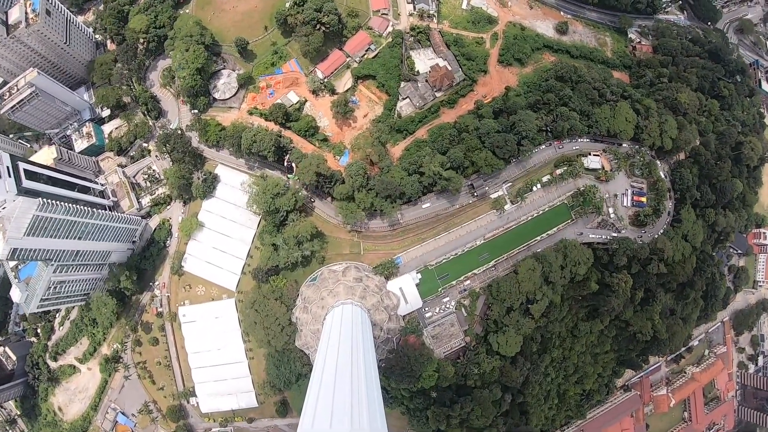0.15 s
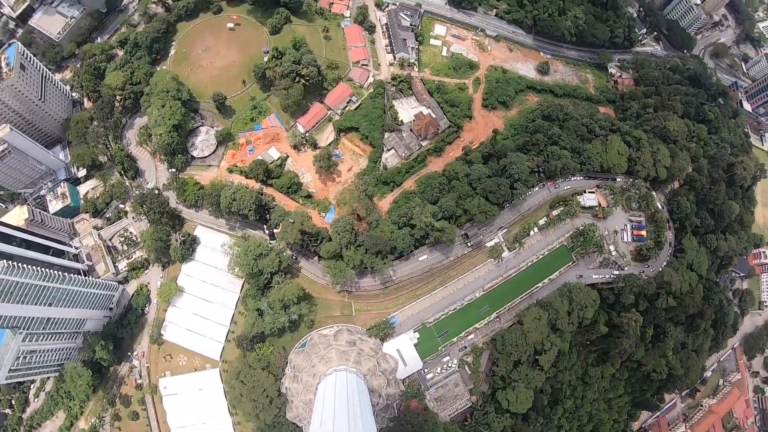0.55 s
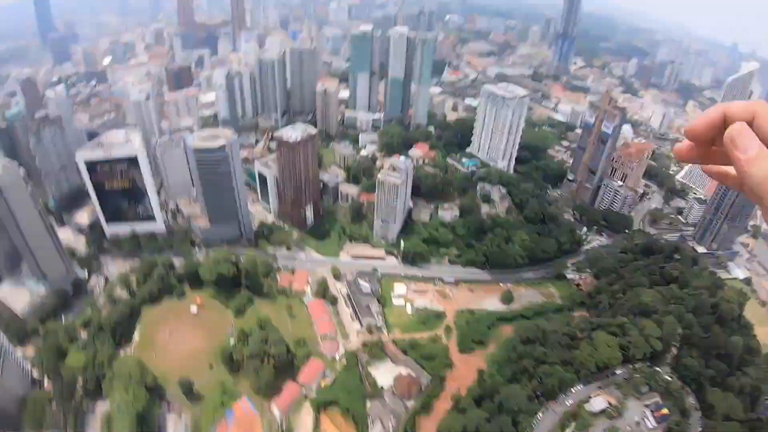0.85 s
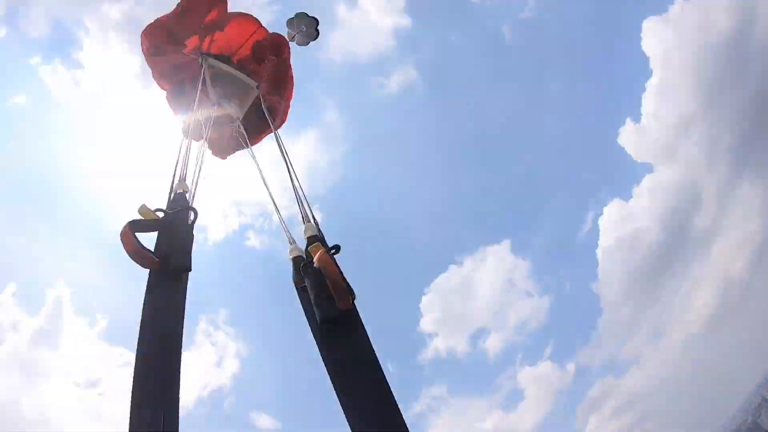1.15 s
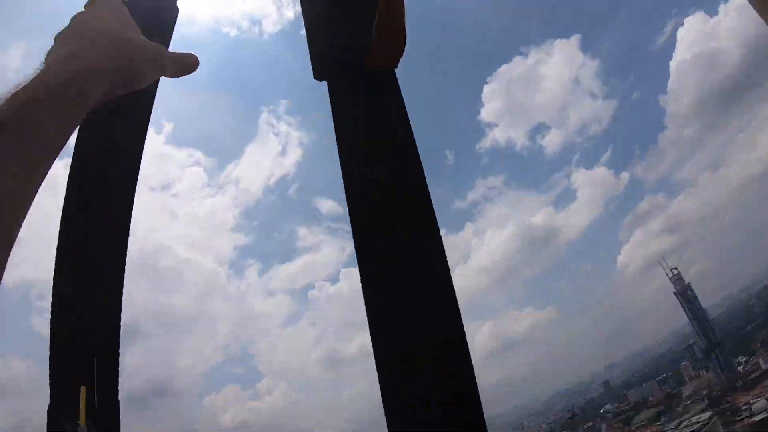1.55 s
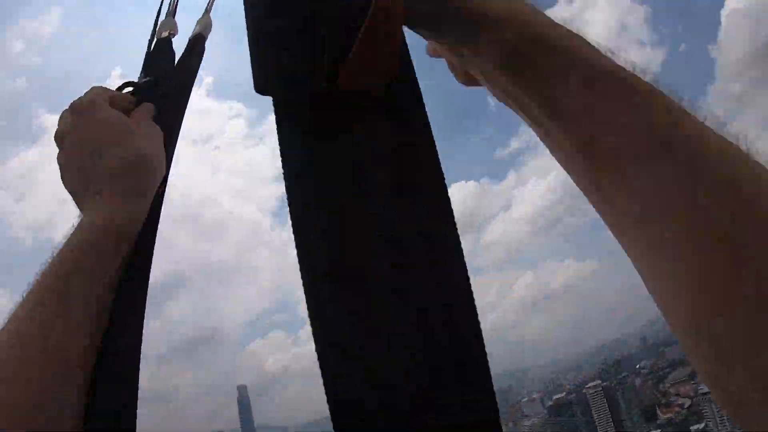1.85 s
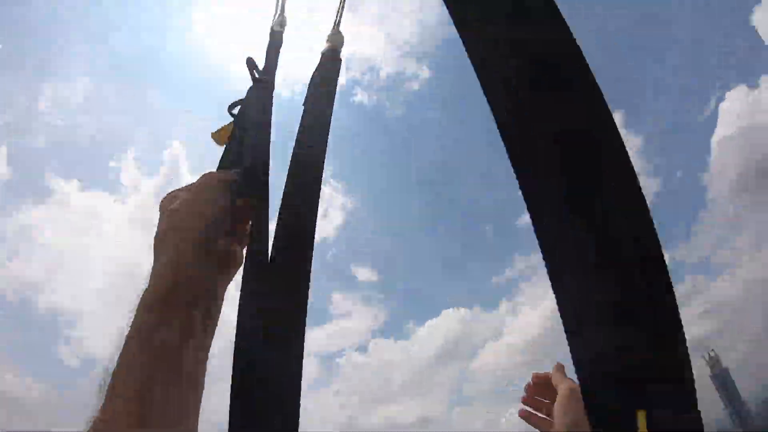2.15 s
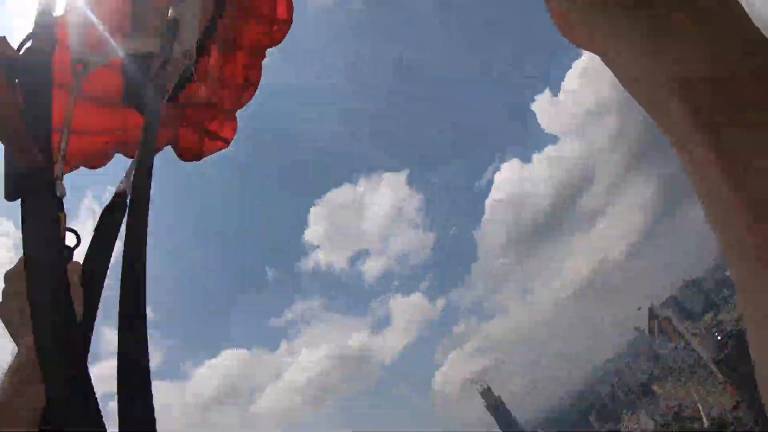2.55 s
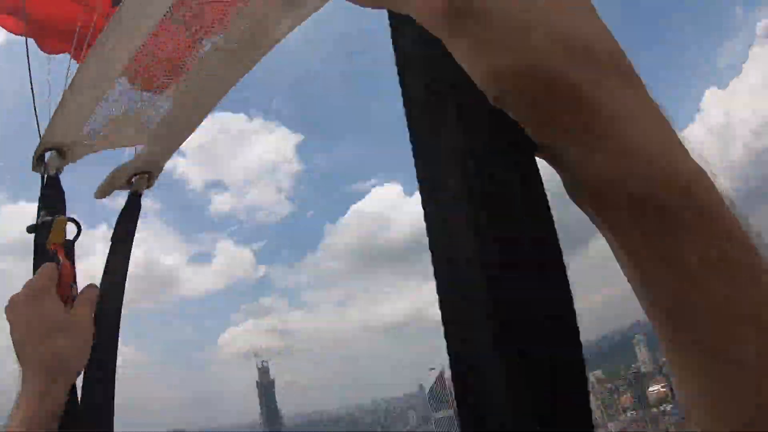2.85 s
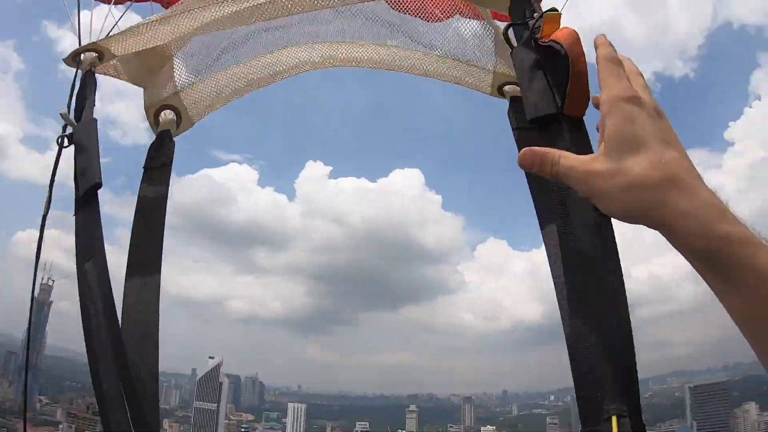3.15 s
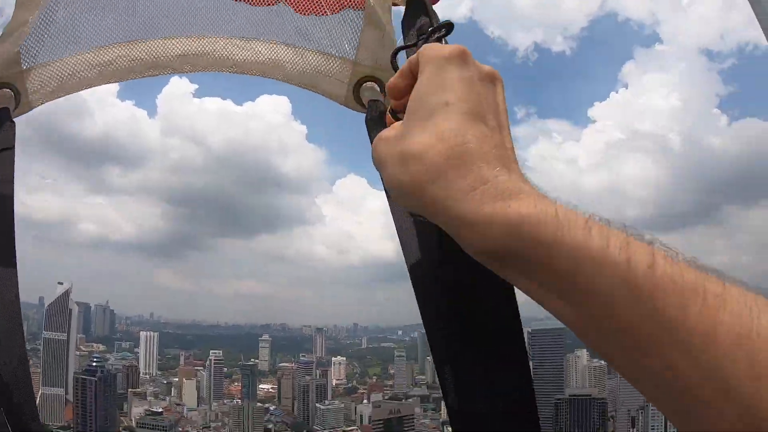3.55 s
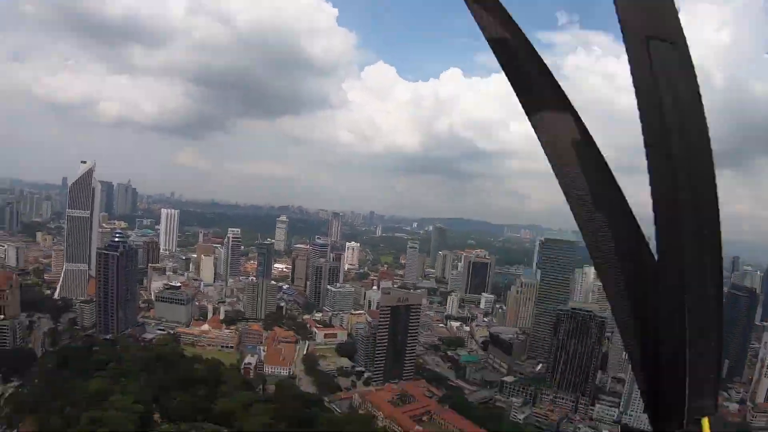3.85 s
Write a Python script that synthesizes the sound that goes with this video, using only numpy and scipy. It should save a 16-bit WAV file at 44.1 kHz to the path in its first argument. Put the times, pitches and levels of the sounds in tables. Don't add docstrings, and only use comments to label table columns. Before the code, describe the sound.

Roaring wind buffets a microphone until a canopy snaps open, then dull air and small clicks

```python
import sys
import numpy as np
from scipy import signal
from scipy.io import wavfile

SR = 44100
rng = np.random.default_rng(int(sys.argv[2]) if len(sys.argv) > 2 else 0)


def inscribe(sig):
    pcm = np.round(np.clip(np.atleast_2d(sig).T, -1, 1) * 32767)
    wavfile.write(sys.argv[1], SR, pcm.astype(np.int16))


def gain_from_db(level_db):
    decades = np.asarray(level_db, float) / 20
    return 10 ** decades


N = 176400

# t/s, level/dB
CANOPY_LEVEL = [
    (1.6, -69),
    (1.9, -56.5),
    (2.05, -47),
    (2.33, -46),
    (2.62, -48),
    (2.72, -56),
    (3.15, -50.5),
    (3.47, -62),
    (3.7, -53),
    (4, -49),
]
# f/Hz, density/dB per Hz
CANOPY_SPECTRUM = [(710, -30), (1200, 2), (1700, -3.5), (3030, -2), (5000, -10), (6500, -28.5)]
# t/s, length/s, level/dB, first f/Hz, last f/Hz
SLIDES = [(1.23, .11, -37.5, 2820, 3314), (1.188, .06, -29, 2700, 1900), (1.24, 0.095, -28.5, 1300, 1700),
          (1.31, 0.07, -40, 2307, 2100), (1.36, .14, -35, 1492, 1644), (2.308, 0.065, -48, 4800, 4200),
          (3.1, 0.15, -51, 1997, 1800), (3.57, 0.062, -40, 350, 1000), (2.68, .2, -55, 2800, 2900),
          (2.68, .09, -52, 1700, 1650), (3.93, 0.084, -41, 1900, 2100), (3.94, .08, -43, 2700, 3000)]
# t/s, peak level/dB, f/Hz
TICKS = [(0.76, -15, 6000), (1.0657, -23.5, 6500), (.763, -16, 3600), (1.095, -27, 6500),
         (2.322, -34, 4900), (2.334, -34, 5500), (2.3644, -35, 4020), (2.422, -37, 4500),
         (2.608, -37.5, 4530), (2.8312, -35.5, 4350), (2.9023, -43, 5500), (3.048, -25.5, 5400),
         (3.0694, -30.5, 2000), (3.1123, -36, 6960), (3.189, -45, 5500), (3.3424, -45.5, 5570),
         (3.533, -48, 6000), (3.71, -26, 2630), (3.742, -25.5, 3950), (3.755, -31, 4500),
         (3.768, -18, 2950), (3.823, -25, 3490), (2.741, -40, 3500), (2.67, -49, 6000), (3.851, -25, 3000)]
# t/s, peak level/dB, f/Hz, ring/s (to -60 dB)
KNOCKS = [(.943, -15, 2000, .012), (1.005, -13, 700, .01), (1.022, -20, 1500, .01),
          (1.056, -17, 1800, 0.023), (1.066, -23, 1900, .02), (1.094, -17, 1300, .01),
          (1.112, -20, 1200, .01), (1.137, -14, 1700, .012), (1.137, -12, 900, 0.0089),
          (1.172, -11, 900, .008), (1.265, -20, 1350, .04), (1.296, -23, 1950, .04),
          (1.298, -22, 3800, .03), (1.343, -7, 600, .02), (1.376, -17, 1050, 0.035),
          (1.493, -24, 900, 0.027), (1.493, -26, 1500, .03), (1.493, -33.5, 5000, 0.019),
          (1.545, -22.5, 2600, 0.023), (1.545, -13, 550, .02), (1.587, -31, 3250, .025),
          (1.587, -25, 850, .03), (1.61, -12.5, 500, .03), (1.643, -31, 1900, 0.028), (1.7, -27, 770, .02),
          (1.74, -29, 650, .04), (1.83, -26, 670, 0.042), (1.834, -36, 1100, .03), (1.894, -25, 700, .015),
          (1.95, -20, 650, .04), (1.951, -26.5, 1150, 0.038), (1.952, -34, 2050, .03),
          (1.972, -37, 1150, 0.037), (2.001, -23, 750, 0.016), (2.043, -38, 1200, .04),
          (2.063, -21, 700, .01), (2.1, -31.5, 1200, .04), (2.275, -24, 900, 0.019), (2.321, -16, 800, .02),
          (2.42, -27, 900, .015), (3.05, -24, 1300, .005), (3.943, -31, 2300, .01),
          (3.973, -28, 2500, .012), (3.985, -30, 2100, .012)]
# t/s, length/s, level/dB, swell/dB
TEARS = [
    (3.0, 0.0553, -32.5, 26),
    (3.745, 0.038, -28.5, 21),
    (3.786, .021, -24, 2),
    (3.861, 0.027, -28.5, -4.5),
    (3.81, 0.051, -43.5, 2.5),
]
# f/Hz, density/dB per Hz
HOOK_SPECTRUM = [(470, -49), (800, -21), (1240, -0.5), (2420, -7.5), (3070, 5.5), (6680, -17), (9500, -28),
                 (12400, -55), (20900, -120)]
# f/Hz, width/Hz, level/dB
TAB_MODES = [
    (1900, 900, -3),
    (2950, 900, 3),
    (5670, 760, -6.5),
]
# t/s, length/s, level/dB, top f/Hz
GUSTS = [(2.21, 0.088, -21, 580), (2.305, 0.012, -20, 900), (2.417, 0.048, -22, 490),
         (2.515, 0.027, -20.5, 250), (2.594, 0.044, -20.5, 244), (2.664, 0.009, -17.5, 300),
         (2.818, 0.022, -27, 302), (2.978, 0.029, -27, 150), (1.759, 0.025, -19, 500),
         (1.934, 0.023, -20, 500), (3.074, 0.06, -16.5, 210), (3.486, 0.01, -26.5, 150),
         (3.793, 0.078, -29, 150), (3.928, 0.074, -28.5, 300)]
# t/s, crack level/dB, body level/dB, length/s
FLAPS = [(0.932, -27, -18.5, 0.0045), (0.94, -25, -21.5, 0.008), (1.053, -19, -20, 0.0036),
         (1.136, -31, -19.5, 0.0038), (1.2, -19, -18, 0.02), (1.246, -20.5, -30, 0.0072),
         (1.268, -27, -27, 0.0044), (1.295, -21.5, -27, 0.0065), (1.403, -36, -26, 0.024),
         (1.481, -36.5, -22, 0.017), (1.544, -32, -20.5, 0.0035), (1.586, -36, -20.5, 0.0027),
         (1.599, -40.5, -21, 0.0095), (1.645, -43, -35, 0.008), (1.698, -49, -31, 0.0037),
         (1.769, -48.5, -33.5, 0.015), (1.947, -39, -27.5, 0.0086), (2.231, -46, -34, 0.0069),
         (2.322, -47, -28, 0.0059)]
# f/Hz, density/dB per Hz
CLOTH_SPECTRUM = [(710, -30), (1200, 4), (1830, -1.5), (3700, -9.5), (6550, -21.5), (9500, -34),
                  (12400, -62.5), (20900, -120)]
# t/s, level/dB, tilt/dB per octave
RUSH = [(0, -19, 0.6), (.7, -22.5, 0.97), (.86, -23.5, 1), (.945, -28, -2.3), (.965, -41.5, 1.7),
        (1.03, -32, -1), (1.08, -39.5, 1.5), (1.18, -32.5, -2), (1.22, -28, -0.7), (1.38, -27.5, -4),
        (1.45, -41, -3.6), (1.5, -37, -2.5), (1.75, -49, -2.5), (2.85, -47.5, -1), (2.96, -53, -1),
        (3.1, -46, -1.5), (3.5, -50.5, -1), (4, -47, 2)]
# f/Hz, density/dB per Hz
RUSH_SPECTRUM = [(180, -30), (300, 0), (347, -4), (1330, -11.5), (2340, -19), (8100, -35.5), (9500, -35.5),
                 (12400, -66), (20900, -120)]
# t/s, level/dB, eddy pitch shift/octaves
BUFFET = [(0, -12, 1.0), (.45, -12.5, 0.85), (.9, -12, 0.91), (1.0, -13, 0.6), (1.13, -14, .45),
          (1.2, -12, 0.84), (1.45, -9.5, 0.89), (1.68, -16, -0.09), (2.05, -17.5, -0.36),
          (2.3, -15.5, -0.089), (2.6, -22, -0.6), (2.72, -22, -0.27), (2.95, -30.5, -0.29),
          (3.2, -38.5, 0.22), (3.65, -34.5, 0.099), (3.74, -37.5, 0.022), (4, -30, 0.14)]
# f/Hz, density/dB per Hz
EDDY_SPECTRUM = [(11, -38), (18, -3.5), (65, -0.5), (92, -0.5), (451, -22.5), (667, -37.5), (2500, -52.5),
                 (3250, -79), (5500, -120)]


def in_time(rows):
    s, *columns = np.transpose(rows)
    return [np.interp(np.arange(N) / SR, s, column) for column in columns]


def at_hz(points, hz):
    point_hz, point_db = np.transpose(points)
    return np.interp(np.log(hz), np.log(point_hz), point_db)


def rms_one(x):
    return x / np.sqrt(np.mean(x ** 2) + 1e-20)


def drift(rate_hz):
    pole = np.exp(-80 * np.pi * rate_hz / SR)
    noise = rng.standard_normal(N // 40 + 2002)
    slow = signal.lfilter([1], [1, -2 * pole, pole * pole], noise)[2000:]
    return np.interp(np.arange(N) / 40, np.arange(len(slow)), rms_one(slow))


def band(x, low_hz, high_hz, order=2):
    edges_hz = [low_hz, min(high_hz, 0.45 * SR)]
    return signal.sosfilt(signal.butter(order, edges_hz, "band", fs=SR, output="sos"), x)


def lowpass(x, cut_hz, order):
    return signal.sosfilt(signal.butter(order, cut_hz, fs=SR, output="sos"), x)


def bank(source, gain_db, low_hz, count):
    out, power = 0, 0
    for k in range(count):
        edge_hz = low_hz * 2 ** (k / 2)
        spectrum_db, flutter_db = gain_db(edge_hz * 2 ** 0.25)
        filtered = band(source[k % 2], edge_hz, edge_hz * np.sqrt(2))
        out = out + gain_from_db(spectrum_db + flutter_db) * filtered
        power = power + gain_from_db(spectrum_db) ** 2 * edge_hz * (np.sqrt(2) - 1) * 2 / SR
    return out / np.sqrt(power)


def window(start_s, length_s, rise_s, fall_s):
    t = np.arange(N) / SR - start_s
    return np.clip(t / rise_s, 0, 1) * np.exp(-np.clip(t - length_s, 0, 1) / fall_s)


def grains(rate_per_s, spread_db):
    sizes = gain_from_db(spread_db * np.minimum(rng.exponential(1, N), 4)) * rng.choice([-1, 1], N)
    return rms_one(sizes * (rng.random(N) < rate_per_s / SR) + 1e-18)


def canopy():
    edge_hz, whistle_hz, whistle_db = 5370, 7620, -23.5
    level_db, = in_time(CANOPY_LEVEL)
    flutter_db = 3.0 * drift(22)
    white = rng.standard_normal((2, N))

    def gain_db(hz):
        tilt_db = 0.68 * (level_db + 49.5) * np.log2(hz / 2000)
        return at_hz(CANOPY_SPECTRUM, hz) + tilt_db, flutter_db + 1.6 * drift(12)

    hiss = lowpass(bank(white, gain_db, low_hz=1097, count=5), edge_hz, order=8)
    whistle = rms_one(band(white[0], whistle_hz / 1.1, whistle_hz * 1.096))
    return gain_from_db(level_db) * (hiss + gain_from_db(whistle_db + flutter_db) * whistle)


def slides():
    width_hz, rise_s, fall_s = 256, 0.028, 0.022
    out, t = 0, np.arange(N) / SR
    slow_grit = lowpass(grains(5000, spread_db=2.5), width_hz, order=3)
    for s, length_s, db, first_hz, last_hz in SLIDES:
        hz = first_hz + (last_hz - first_hz) * np.clip((t - s) / length_s, 0, 1)
        carrier = np.cos(2 * np.pi * np.cumsum(hz) / SR)
        out = out + gain_from_db(db) * window(s, length_s, rise_s, fall_s) * rms_one(slow_grit * carrier)
    return out


def ticks():
    decay_s = 0.0024
    out, white = np.zeros(N + SR), rng.standard_normal((len(TICKS), 600))
    sparks = white * np.exp(-np.arange(600) / (decay_s * SR))
    for (s, db, hz), spark in zip(TICKS, sparks):
        tick = band(spark, hz / 1.32, hz * 1.126) + 0.2 * band(spark, 900, 5700)
        first = int(s * SR)
        out[first:first + len(spark)] += gain_from_db(db) * tick / np.abs(tick).max()
    return out[:N]


def knocks():
    rise_s = 0.00095
    out, t = np.zeros(N + SR), np.arange(3000) / SR
    for s, db, hz, ring_s in KNOCKS:
        shape = (1 - np.exp(-t / rise_s)) * gain_from_db(-60 * t / max(ring_s, 0.004))
        first = int(s * SR)
        out[first:first + len(t)] += gain_from_db(db + 3) * shape * np.sin(2 * np.pi * hz * t)
    return out[:N]


def tears():
    hooks_per_s, hook_spread_db, tab_db = 3200, 3.6, -6.5
    t, pull = np.arange(N) / SR, 0
    for s, length_s, db, swell_db in TEARS:
        swell = gain_from_db(db + swell_db * (np.clip((t - s) / length_s, 0, 1) - 1))
        pull = pull + swell * window(s, length_s, rise_s=0.0026, fall_s=0.002)
    hooks = grains(hooks_per_s, hook_spread_db) * gain_from_db(2.8 * drift(95))

    def gain_db(hz):
        return at_hz(HOOK_SPECTRUM, hz), 2.2 * drift(65)

    broad = rms_one(bank([hooks, -hooks], gain_db, low_hz=900, count=8))
    tab = 0
    for hz, width_hz, db in TAB_MODES:
        mode = band(hooks, hz - width_hz / 2, hz + width_hz / 2, order=1)
        tab = tab + gain_from_db(db + tab_db) * rms_one(mode)
    return pull * rms_one(broad + tab)


def gusts():
    white = rng.standard_normal(N)
    low, ragged = band(white, 45, 122), gain_from_db(5.6 * drift(40) - 15.5)
    out = 0
    for s, length_s, db, top_hz in GUSTS:
        shape = window(s, length_s, rise_s=0.012, fall_s=0.016)
        push = shape * (low + ragged * band(white, 116, max(top_hz, 140)))
        push = lowpass(push + 1e-18, 2 * top_hz, order=2)
        to_level = np.sqrt(np.sum(shape ** 2) / np.sum(push ** 2))
        out = out + gain_from_db(db) * push * to_level
    return out


def flaps():
    crack, body = 0, 0
    for s, crack_db, body_db, length_s in FLAPS:
        hold_s = max(length_s, 0.001)
        crack = crack + gain_from_db(crack_db) * window(s, hold_s, rise_s=0.0025, fall_s=0.0038)
        body = body + gain_from_db(body_db) * window(s, hold_s, rise_s=0.0015, fall_s=0.0032)
    clicks = grains(4000, spread_db=4.5) * [[1], [-1]]
    grit = (clicks + 0.72 * rng.standard_normal((2, N))) / 1.62

    def gain_db(hz):
        return at_hz(CLOTH_SPECTRUM, hz), 3.1 * drift(40)

    bright = bank(grit, gain_db, low_hz=1275, count=7)
    dull = rms_one(band(rng.standard_normal(N), 400, 1085))
    return crack * bright + body * dull


def rush():
    rustle_per_s, rustle_db, rustle_from_s = 90, -10, 0.87
    level_db, tilt_db = in_time(RUSH)
    flutter_db = 1.17 * drift(9.2) + 1.0 * drift(66)
    rustle = np.abs(grains(rustle_per_s, spread_db=5.0))
    rustle = rustle * (np.arange(N) > rustle_from_s * SR)
    puffs = 1 + gain_from_db(rustle_db) * rms_one(signal.lfilter([1], [1, -0.992], rustle))
    white = rng.standard_normal((2, N)) * puffs

    def gain_db(hz):
        return at_hz(RUSH_SPECTRUM, hz) + tilt_db * np.log2(hz / 1000), flutter_db + 1.4 * drift(15)

    return gain_from_db(level_db) * bank(white, gain_db, low_hz=350, count=11)


def buffet():
    level_db, shift_oct = in_time(BUFFET)
    lumps_db = 4 * np.tanh(0.46 * drift(9.7) + 0.71 * drift(30))
    lumps_db = lumps_db * np.clip(1 - 0.25 * shift_oct, 0, 2)
    white = rng.standard_normal((2, N))

    def gain_db(hz):
        fluctuation_db = lumps_db * (hz / 150) ** 0.28 + 1.54 * drift(18.3)
        return at_hz(EDDY_SPECTRUM, hz / 2 ** shift_oct), fluctuation_db

    return gain_from_db(level_db) * bank(white, gain_db, low_hz=15.97, count=15)


def scene():
    overhead = canopy() + slides()
    contacts = ticks() + knocks() + tears()
    wind = gusts() + rush() + buffet()
    return (overhead + contacts + flaps() + wind)[None]


def low_pass(x):
    return signal.sosfilt(signal.butter(12, 15200, fs=SR, output="sos"), x)


def record(dry):
    ceiling, housing_cut_hz = 0.97, 8750
    rounded = ceiling * np.tanh(dry / ceiling)
    housed = lowpass(rounded, housing_cut_hz, order=4)
    return low_pass(housed)


dry = scene()
out = record(dry)
inscribe(out)
```